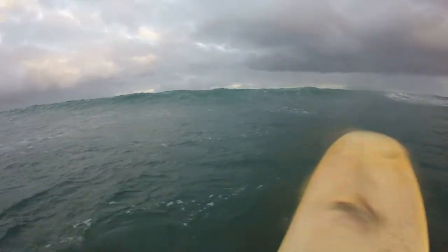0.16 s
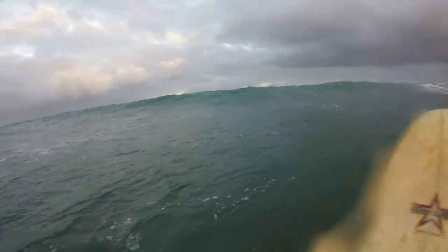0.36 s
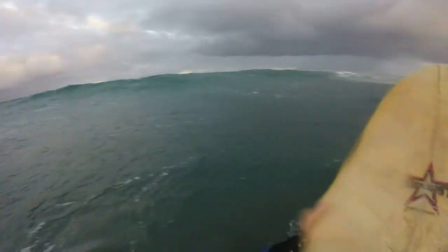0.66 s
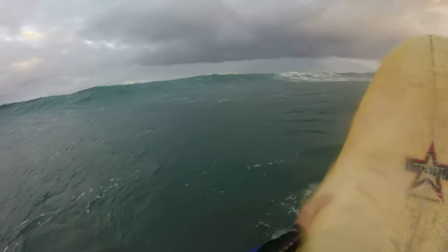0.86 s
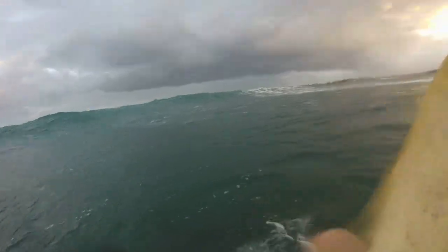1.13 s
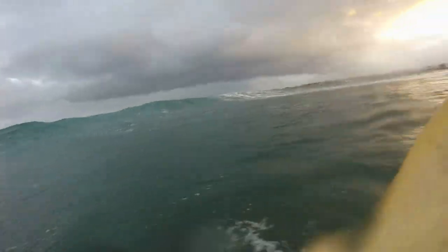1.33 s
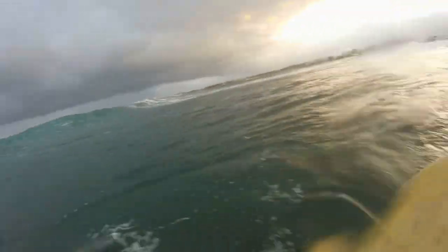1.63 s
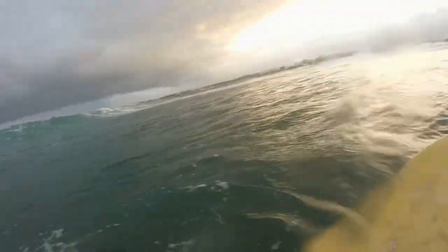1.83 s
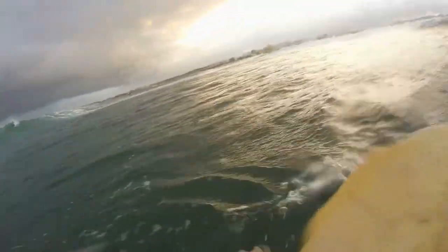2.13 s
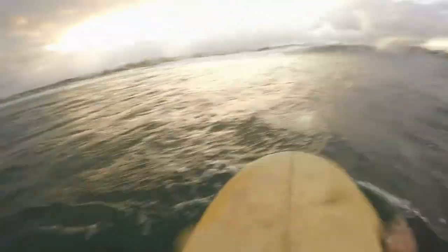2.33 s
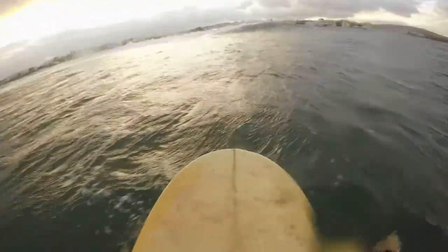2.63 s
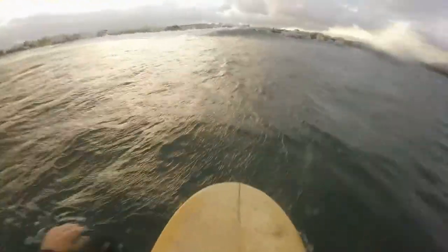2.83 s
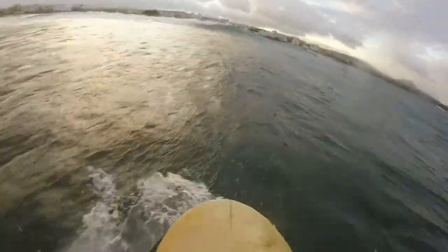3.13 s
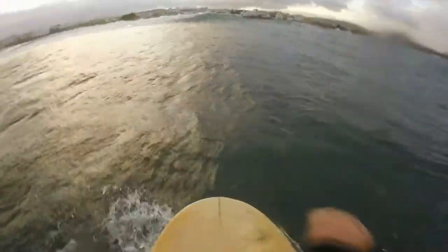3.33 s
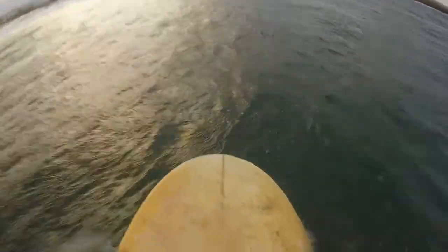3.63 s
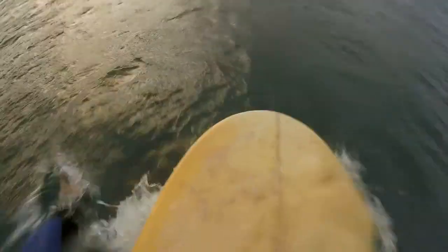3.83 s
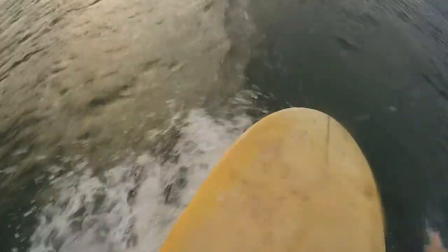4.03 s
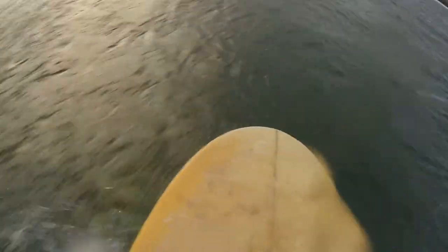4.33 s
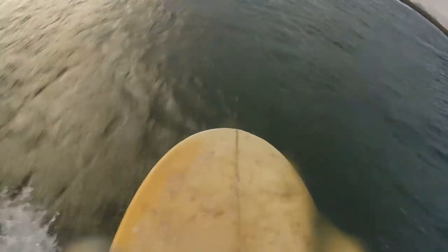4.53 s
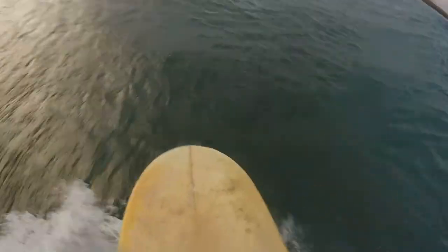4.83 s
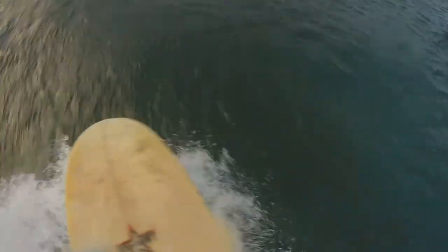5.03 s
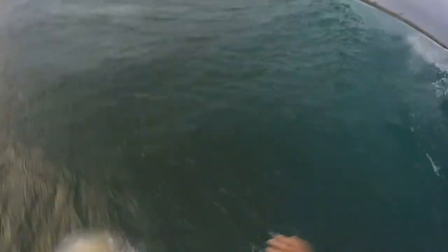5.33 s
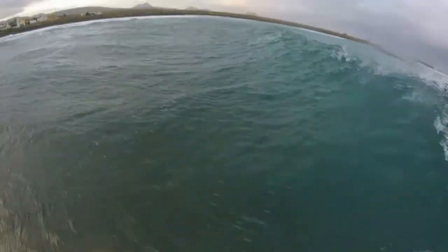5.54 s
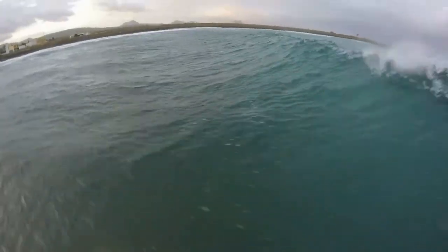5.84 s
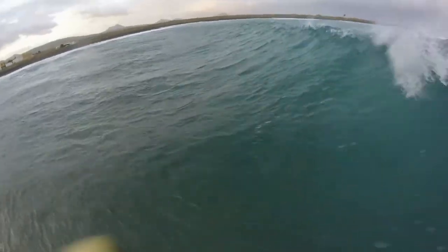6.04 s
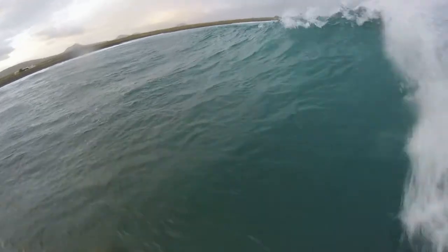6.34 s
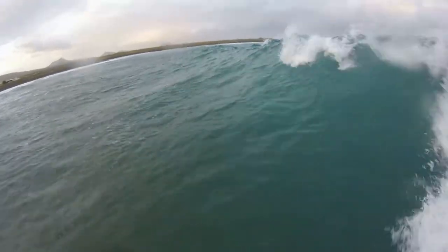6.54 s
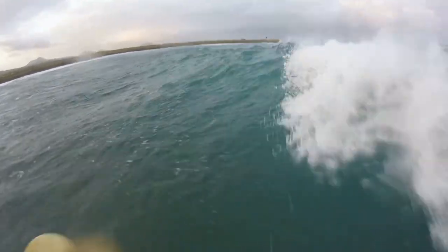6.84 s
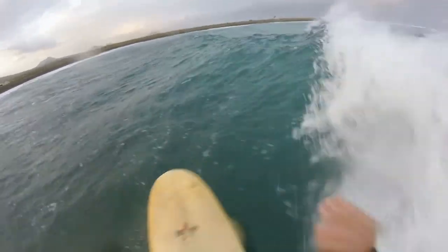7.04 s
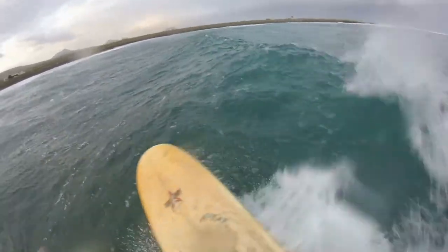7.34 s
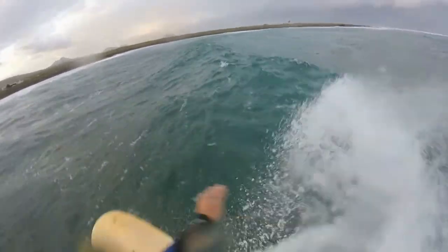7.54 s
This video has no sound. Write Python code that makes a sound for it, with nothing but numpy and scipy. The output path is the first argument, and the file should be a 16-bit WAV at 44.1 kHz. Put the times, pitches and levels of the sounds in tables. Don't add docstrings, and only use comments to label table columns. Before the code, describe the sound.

Open sea from a surfboard, heard very close through a sealed housing that makes the water boxy and hollow, with a midrange ring and subdued top end. From 0 to 1.7 s a soft, bubbly trickling rush wavers, with faint ticks and a knock near 1.2 s. Around 1.75-2 s a tight cluster of hard drops knocks on the case. From 2 to 3.8 s the rush grows, with plops, small spray bursts, wind flutters and a low hull slap near 3.25 s. From 3.8 to 5.3 s water runs stronger; sharp clicking thuds land near 4.25, 4.55 and 4.8 s, with grainy spray, deep gulps and thumps, heaviest around 4.3 and 5.2 s. By 5.5 s breaking whitewater surges up, dense and much louder, churning with fizzing spray and short slaps. A crisp tick comes at 6.8 s, the roar peaks near 7 s, then recedes until 7.7 s.

```python
import sys
import numpy as np
from scipy import signal
from scipy.fft import rfft, irfft, next_fast_len
from scipy.io import wavfile
from scipy.ndimage import uniform_filter1d, map_coordinates

SR = 44100
rng = np.random.default_rng(int(sys.argv[2]) if len(sys.argv) > 2 else 0)


def rack_gain(trim_db):
    fader = np.asarray(trim_db, float)
    return 10 ** (fader / 20)


def wrap_up_sound(samples):
    columns = np.atleast_2d(samples).T
    tamed = np.clip(columns, -1, 1)
    steps = np.round(tamed * 32767).astype(np.int16)
    wavfile.write(sys.argv[1], SR, steps)


N = 338688

# time in seconds, churn level in dB, spray level in dB.
PADDLE_WATER = [(0.0, -52, -68), (0.5, -49.5, -66), (0.8, -48.5, -65.5), (1.07, -51.5, -67.5),
                (1.17, -46, -63), (1.32, -45.5, -63), (1.51, -50.5, -67), (1.8, -51, -71), (2.3, -45, -64),
                (2.74, -42.5, -61), (3.25, -39.5, -58), (3.74, -44.5, -60.5), (4.0, -35, -54),
                (4.44, -34.5, -52.5), (4.63, -37.5, -53.5), (5.25, -38.5, -51.5), (5.33, -36, -50.5),
                (5.45, -30, -48.5)]
# time in seconds, churn level in dB, spray level in dB.
BREAKING_WATER = [(5.6, -26, -50.5), (6.1, -28, -49), (6.3, -27.5, -46), (6.43, -29, -44),
                  (6.6, -29.5, -44.5), (6.8, -30.5, -48.5), (6.91, -27.5, -47), (7.02, -25, -44.5),
                  (7.25, -26.5, -46.5), (7.36, -30.5, -43), (7.68, -35, -50)]


def water():
    # frequency in Hz, level in dB per Hz.
    calm_colour = [(470, -25), (800, -16), (911, -29), (1100, -7.5), (1200, -9), (1480, 1.5), (1560, 2.5),
                   (1700, -1.5), (2170, 0), (2400, -9.5), (3100, -15.5), (4030, -55), (6820, -120)]
    housing_colour = [(530, -31), (900, -24), (1120, -15), (1270, -10.5), (1470, 1.5), (1640, -2.5),
                      (2410, -4.5), (2730, -22.5), (2900, -20), (3770, -38), (6380, -120)]
    splash_colour = [(1530, -13.5), (2600, -1), (2750, -5), (3300, -1.5), (3900, -5), (4400, -7.5),
                     (5000, -15), (6100, -26), (10000, -120)]
    spray_colour = [(2650, -1.5), (4500, -7.5), (5020, -5.5), (5510, -0.5), (6410, -1.5), (7330, -3.5),
                    (8070, -5.5), (8640, -5.5), (9300, -15), (10000, -12.5), (11000, -14.5), (12500, -20),
                    (13700, -20.5), (14500, -60)]
    # time in seconds, peak in dB over the churn, half length in seconds.
    rail_slaps = [(.816, -12, .02), (1.26, -5, .01), (1.613, -1, .015), (3.35, -7, 0.032),
                  (5.47, -10, .012), (5.8, -11, 0.025), (6.3, -11, .03), (6.57, -11, 0.031),
                  (6.87, -19, 0.014), (7.13, -12, 0.013), (7.244, -11, 0.025), (7.32, -25, .015),
                  (7.45, -7, 0.014)]

    churn_db, spray_db = curves(PADDLE_WATER + BREAKING_WATER)
    over_middling_db = churn_db + 40
    splash_db = -52.5 + 0.93 * over_middling_db
    bubble_share = np.clip(0.19 - 0.0054 * over_middling_db, 0, 0.6)
    slaps_db = bubble_share * (wobble(11) + 2.65 * wobble(35))

    big_bubbles = bubbles(count=2500, hz=2260, spread=0.433, cycles=17, spiky_db=1.5)
    churn = patchy(patchy_db=1.04) + bubble_share * big_bubbles
    small_bubbles = bubbles(count=4000, hz=7000, spread=0.47, cycles=24, spiky_db=6.5)
    fizz = patchy(patchy_db=1.64) + bubble_share * small_bubbles

    rush = loaded(blend(churn, calm_colour, housing_colour))
    rush *= rack_gain(churn_db + slaps_db + 0.086 * wobble(22) - 1.7) * (1 + swells(rail_slaps))
    splash_gain = rack_gain(splash_db + 2.0 * slaps_db + 0.22 * wobble(4.2) - 1.7)
    splash = splash_gain * coloured(churn, splash_colour)
    spray = rack_gain(spray_db + 2.4 * slaps_db + 0.6) * coloured(fizz, spray_colour)
    return rush + splash + spray


def loaded(x):
    # time in seconds, lowest mode in dB, middle mode in dB, top mode in dB.
    mode_gains = [(0, -0.5, 2.5, -2), (1.0, -1, 0.5, -1), (1.9, -1.5, 1.5, 0), (2.3, -1, -1, 0),
                  (2.75, 1, -11, -9), (3.3, -0.5, 0, -3), (3.8, 1, -3, -4.5), (4.4, 2, 1.5, 2.5),
                  (5.3, 1, 2, 0), (5.7, -0.5, 0.5, 2), (6.25, 2.5, -2, 1.5), (6.6, -5, 4, 0.5),
                  (7.0, 2, -1, 0), (7.3, 0, 1.5, 0), (7.68, -5, 1, -0.5)]
    mode_bands_hz = [(1350, 1620), (1700, 1960), (2280, 2620)]
    out = x
    for db, band_hz in zip(curves(mode_gains), mode_bands_hz):
        sos = signal.butter(2, band_hz, "band", fs=SR, output="sos")
        out = out + (rack_gain(db) - 1) * signal.sosfiltfilt(sos, x)
    return out


def blend(x, near, far):
    wave_share = np.interp(np.arange(N) / SR, [3.7, 4.1, 5.1, 5.5], [0.47, 0.33, 0.5, 0.79])
    return unit((1 - wave_share) * coloured(x, near) + wave_share * coloured(x, far))


def bubbles(count, hz, spread, cycles, spiky_db):
    s, normal = rng.random(count) * N / SR, rng.standard_normal((count, 2))
    pitch = np.clip(hz * np.exp(spread * normal[:, 0]), 300, SR / 3)
    return unit(rings(s, pitch, cycles / pitch, rack_gain(spiky_db * normal[:, 1]), rise=0.44, size=256))


def ridges():
    # centre in Hz, width in Hz, level in dB over the spray.
    upper_modes = [(6440, 400, -12), (8030, 380, -16.5), (9230, 550, -16)]
    # time in seconds, peak in dB over the spray, half length in seconds.
    film_swells = [
        (.38, -1, 0.28),
        (.79, 8, 0.019),
        (1.3, 2, 0.22),
        (3.7, -7, 0.13),
        (4.13, 1, 0.13),
        (5.5, -7.5, 0.63),
        (6.53, -4, 0.14),
        (7.4, -7, 0.75),
    ]
    churn_db, spray_db = curves(PADDLE_WATER + BREAKING_WATER)
    upper = 0
    for hz, width, db in upper_modes:
        upper = upper + rack_gain(db + 2.1 * wobble(3.3)) * narrow(hz, width)

    film = rack_gain(-4) + swells(film_swells)
    blips_db = np.clip(-0.2 * (churn_db + 28), 1, 5) * wobble(45)
    singing = film * rack_gain(0.88 * wobble(12) + blips_db - 3.5) * narrow(3950, 330)
    return rack_gain(spray_db) * (upper + singing)


def narrow(hz, width):
    skirt = [(hz - 2 * width, -60), (hz - width / 2, -3), (hz, 0), (hz + width / 2, -3), (hz + 2 * width, -60)]
    return coloured(rng.standard_normal(N), skirt)


def sheets():
    # start in seconds, peak level in dB, length in seconds.
    thrown = [(0.353, -50, 0.02), (1.434, -47.5, 0.025), (1.464, -49, 0.017), (2.126, -49, 0.031),
              (2.228, -49, 0.03), (2.26, -46.5, 0.057), (2.471, -48, 0.03), (2.593, -45, 0.026),
              (3.077, -49, 0.014), (3.18, -45, 0.033), (3.498, -43, 0.018), (3.54, -62, 0.02),
              (3.636, -45, 0.013), (3.643, -41.5, 0.029), (3.796, -37, 0.027), (3.935, -43, 0.052),
              (4.104, -39, 0.018), (4.136, -37, 0.023), (4.1594, -40, 0.022), (4.536, -30, 0.024),
              (4.594, -37.5, 0.041)]
    # frequency in Hz, level in dB per Hz.
    sheet_colour = [(800, -26), (1500, 6), (2300, 13), (4000, 3), (5000, -2.5), (8000, -2), (10000, -11),
                    (13700, -23), (14500, -60)]
    t, level = np.arange(4000) / SR, np.zeros(N)
    for s, db, length in thrown:
        attack = 1 - np.exp(-12 * t / length)
        level[round(s * SR):][:4000] += rack_gain(db - 3.5) * attack * np.exp(-(t / length) ** 3)
    grain = rack_gain(3 * wobble(300))
    return level * coloured(grain * rng.standard_normal(N), sheet_colour)


def thuds():
    # start in seconds, peak in dB, pitch in Hz, splash in dB over the thud, splash pitch in Hz.
    heavy_drops = [(1.1877, -26, 1850, -17, 3500), (1.7495, -33, 2200, -12, 3200),
                   (1.7545, -29, 2300, -14, 3300), (1.771, -26.5, 2420, -17, 3400),
                   (1.8275, -17, 2100, -14, 3530), (1.8334, -22, 1800, -16, 4020),
                   (1.894, -27.5, 1830, -13, 3520), (1.921, -33, 1700, -14, 3500),
                   (1.9222, -13, 2110, -13, 3280), (1.9268, -19, 1900, -16, 3300),
                   (1.9305, -32, 1800, -15, 4200), (1.9565, -43, 1900, -12, 3900),
                   (1.9776, -16, 1900, -14.5, 3550), (2.24, -33, 1560, -21, 3500),
                   (2.303, -25, 1540, -14, 3100), (2.443, -37, 2160, -27, 3500),
                   (2.602, -23, 2150, -14, 3200), (2.666, -24.5, 1550, -24, 3500),
                   (2.7014, -23, 1470, -29, 3500), (2.786, -22.5, 1470, -27, 3000),
                   (3.186, -24, 2400, -10, 2900), (3.6465, -34, 1520, -8, 4000),
                   (3.7987, -19.5, 2200, -9, 2900), (3.8016, -19.5, 2100, -21, 3500),
                   (3.838, -17.5, 2150, -24, 3160), (4.2542, -11.5, 2420, -13.5, 3800),
                   (4.535, -15.5, 1550, -16, 3300), (4.5456, -20, 2100, -12, 3020),
                   (4.5523, -20, 1750, -22, 3000), (4.8101, -9, 1680, -45, 3000),
                   (4.8432, -18, 2100, -34, 3000), (4.85, -21, 2030, -30, 3000)]
    s, db, hz, splash_db, splash_hz = np.transpose(heavy_drops)
    t60 = 0.017 * rack_gain(0.08 * (db + 32.5))
    splashes = drops(s, db + splash_db, splash_hz, 0.64 * t60, spread=0.29, count=6)
    return through_housing(knocks(s, db, hz, t60) + splashes)


def knocks(s, db, hz, t60):
    cavity_modes = [1464, 1800, 2100, 2420]
    mode = np.tile(cavity_modes, len(s))
    s, db, hz, t60 = np.repeat([s, db, hz, t60], len(cavity_modes), axis=1)
    scatter = rng.standard_normal((len(s), 2))
    level_db = db - 4 - 80 * np.log(mode / hz) ** 2 + 1.2 * scatter[:, 0]
    life = np.clip(0.8 * t60 * 1700 / mode, 0.004, 0.022)
    pitch = mode * (1 + 0.015 * scatter[:, 1])
    return rings(s + 0.00031, pitch, life, rack_gain(level_db), rise=0.013, size=1000, sharp=27)


def ticks():
    # start in seconds, peak level in dB, pitch in Hz, pitch spread as a log ratio.
    droplets = [(0.1032, -48, 7500, 0.15), (0.786, -46, 7300, 0.3), (1.0336, -42, 6400, 0.51),
                (1.199, -42, 6450, 0.58), (1.5683, -46, 6410, 0.61), (1.7494, -39, 7700, 0.25),
                (1.754, -44, 8500, .25), (1.7704, -41, 7700, 0.39), (1.8265, -32, 8150, 0.11),
                (1.8263, -37, 5400, .1), (1.827, -51, 11500, .08), (1.833, -42, 6500, 0.3),
                (1.8946, -41, 7140, 0.3), (1.9192, -44, 8110, 0.49), (1.922, -33, 6300, 0.33),
                (1.931, -49, 7530, 0.3), (1.956, -49, 6320, 0.33), (1.9786, -34, 7000, 0.47),
                (2.349, -44, 8540, 0.22), (2.4683, -44, 6500, 0.3), (2.598, -44, 6500, 0.43),
                (2.999, -43, 8400, 0.49), (3.4965, -42, 6500, 0.3), (3.6474, -38, 6590, 0.35),
                (3.7993, -32, 7900, 0.26), (4.111, -36, 7130, 0.35), (4.16, -29, 7000, 0.38),
                (4.254, -20, 8540, 0.3), (4.5372, -34, 8160, 0.25), (4.836, -24, 7860, 0.11),
                (4.8362, -33, 5800, 0.22), (4.261, -37, 8500, .2), (5.5272, -26.5, 5960, 0.56),
                (6.7974, -19, 7850, 0.13), (4.254, -36, 12500, 0.11), (4.254, -26, 5600, .15),
                (1.9222, -46, 12000, 0.14), (6.7973, -35.5, 9800, 0.18), (1.8335, -52, 12000, .1)]
    s, db, hz, spread = np.transpose(droplets)
    t60 = np.full(len(s), 0.0063)
    return through_housing(drops(s, db - 4.5, hz, t60, np.clip(spread, 0.05, 0.6), count=11))


def plops():
    # start in seconds, peak level in dB, pitch in Hz, T60 in seconds, pitch spread as a log ratio.
    single_bubbles = [(.39, -40, 950, 0.016, .3), (1.197, -31, 1800, 0.034, 0.052),
                      (2.444, -26, 2190, 0.022, 0.046), (2.886, -33, 3860, 0.022, 0.028),
                      (3.747, -36, 800, .013, 0.3), (3.839, -32, 780, 0.018, 0.27),
                      (2.135, -39, 3150, 0.022, .04), (2.239, -34, 1500, 0.017, .05),
                      (4.811, -25, 1470, 0.024, .04), (2.157, -44, 4000, .015, .04),
                      (2.182, -44, 3950, .015, .04), (2.276, -43, 4070, .015, .05),
                      (2.351, -38, 1850, .015, .05), (2.485, -34, 1520, .015, .05),
                      (2.575, -30, 1450, .015, .05)]
    return drops(*np.transpose(single_bubbles), count=3)


def drops(s, db, hz, t60, spread, count):
    fan = np.tile(np.linspace(-1, 1, count), len(s))
    s, db, hz, t60, spread = np.repeat([s, db, hz, t60, spread + 0 * s], count, axis=1)
    scatter = rng.standard_normal((len(s), 3))
    pitch = np.clip(hz * np.exp(spread * (fan + 0.05 * scatter[:, 0])), 300, SR / 3)
    level_db = db - 17.5 * fan ** 2 + 1.2 * scatter[:, 1]
    start = s + 0.0009 + 0.0001 * scatter[:, 2]
    return rings(start, pitch, np.clip(t60, 0.002, 0.04), rack_gain(level_db), rise=0.014, size=1000)


def through_housing(x):
    return signal.sosfilt(signal.butter(3, [1100, 15000], "band", fs=SR, output="sos"), x)


def gulps():
    # start in seconds, length in seconds, level in dB, first pitch in Hz, last pitch in Hz.
    low_glides = [(3.23, 0.066, -53, 151, 98), (4.25, 0.078, -36, 172, 170),
                  (5.115, 0.153, -33, 183.5, 125), (3.239, 0.062, -33, 89, 65),
                  (4.808, 0.0125, -32, 270, 266), (5.197, 0.072, -26.5, 73, 53),
                  (4.262, 0.05, -37, 94, 95), (5.2, 0.051, -31.5, 139, 110), (4.41, 0.075, -43, 250, 282),
                  (4.1, 0.074, -45, 225, 255), (5.255, 0.032, -45, 480, 500)]
    t, low = np.arange(N) / SR, np.zeros(N)
    for s, length, db, from_hz, to_hz in low_glides:
        u = np.clip((t - s) / length, 0, 1)
        cycles = length * u * (from_hz + (to_hz - from_hz) * u / 2)
        low += rack_gain(db) * np.sqrt(np.abs(np.sin(np.pi * u))) * np.sin(2 * np.pi * cycles)
    return low


def hull():
    # time in seconds, level in dB.
    planing_levels = [(0.0, -55.5), (2.0, -55.5), (2.15, -53.5), (3.93, -55), (4.05, -45), (4.17, -42.5),
                      (4.4, -47.5), (5.3, -46.5), (5.62, -42.5), (7.2, -41.5), (7.68, -47)]
    # time in seconds, peak level in dB, half length in seconds.
    hull_slams = [(1.64, -56, 0.029), (1.83, -56, 0.077), (2.06, -58, .05), (2.5, -61, 0.18),
                  (2.73, -67, 0.034), (3.26, -43, 0.047), (3.63, -58, 0.034), (3.81, -54, 0.031),
                  (3.95, -52, 0.048), (4.12, -43.5, 0.036), (4.28, -34, 0.027), (4.56, -45.5, 0.063),
                  (4.815, -48, 0.017), (5.04, -42.5, 0.043), (5.2, -37.5, 0.047), (5.39, -45.5, 0.039),
                  (6.2, -58, 0.021), (6.4, -49, 0.025), (7.2, -55, 0.054)]
    # frequency in Hz, level in dB per Hz.
    thump_colour = [(32, -43), (55, 5), (166, -6), (200, -55), (260, -11.5), (440, -120)]
    slosh_colour = [(100, -2), (170, -3), (260, -1.5), (480, -7), (600, -14.5), (950, -35), (1240, -53),
                    (2090, -120)]
    roar_colour = [(100, -32), (170, 2.5), (330, -4.5), (473, -2), (595, -9), (841, -15.5), (950, -8),
                   (1240, -3), (2090, -120)]
    planing, slams = rack_gain(curves(planing_levels)[0]), swells(hull_slams)
    thump = unit(rack_gain(0.67 * wobble(25)) * coloured(rng.standard_normal(N), thump_colour))
    roar = unit(rack_gain(0.84 * wobble(15)) * blend(patchy(patchy_db=0.7), slosh_colour, roar_colour))
    return (rack_gain(-0.5) * planing + slams) * thump + (planing + rack_gain(-23.5) * slams) * roar


def wind():
    # time in seconds, level in dB.
    steady_wind = [
        (0.0, -52),
        (2.0, -48.5),
        (2.9, -44),
        (3.6, -42),
        (3.9, -38),
        (5.25, -43),
        (5.4, -49),
        (7.68, -44),
    ]
    # time in seconds, peak level in dB, half length in seconds.
    gusts = [(0.0, -54, .06), (1.65, -51, 0.12), (2.1, -39, 0.043), (2.57, -47, 0.06), (2.79, -37, 0.013),
             (3.25, -43.5, 0.2), (3.94, -34, 0.065), (4.12, -42, 0.034), (4.27, -45.5, 0.026),
             (4.47, -48, 0.041), (4.77, -34, 0.062), (5.03, -38.5, 0.094), (5.15, -39, 0.021),
             (5.26, -30, 0.023), (6.4, -56, 0.035), (7.2, -56, 0.063)]
    # frequency in Hz, level in dB per Hz.
    buffet_colour = [(6, -14), (10, 18), (28, 15), (45, 2.5), (70, -7), (91, -8), (150, -120)]
    buffet = coloured(rng.standard_normal(N), buffet_colour)
    return (rack_gain(curves(steady_wind)[0]) + swells(gusts)) * buffet


def unit(x):
    return x / np.sqrt(np.mean(x ** 2) + 1e-20)


def curves(rows):
    s, *cols = np.transpose(rows)
    return [np.interp(np.arange(N) / SR, s, c) for c in cols]


def swells(rows):
    t = np.arange(N) / SR
    gain = np.zeros(N)
    for s, db, half in rows:
        gain += rack_gain(db) * np.cos(np.pi / 2 * np.clip((t - s) / (2 * half), -1, 1)) ** 2
    return gain


def wobble(rate):
    coarse = np.arange(0, N + 32, 32)
    knots = rng.standard_normal(int(N * rate / SR) + 4)
    return np.interp(np.arange(N), coarse, map_coordinates(knots, [coarse * rate / SR]))


def coloured(x, spectrum):
    m = next_fast_len(N + 8192)
    f, db = np.transpose(spectrum)
    gain_db = np.interp(np.log(np.fft.rfftfreq(m, 1 / SR) + 1), np.log(f + 1), db)
    return unit(irfft(rfft(x, m) * rack_gain(gain_db), m)[:N])


def patchy(patchy_db):
    z = signal.stft(rng.standard_normal(N + 512), nperseg=512)[2]
    field = uniform_filter1d(rng.standard_normal(z.shape), size=6, axis=0)
    field = uniform_filter1d(field, size=6, axis=1)
    return unit(signal.istft(z * rack_gain(patchy_db * unit(field)), nperseg=512)[1][:N])


def rings(s, hz, t60, gain, rise, size, sharp=90):
    t = np.arange(size) / SR
    u = t / t60[:, None]
    envelope = gain[:, None] * rack_gain(-60 * u) * (1 - np.exp(-sharp * u))
    wave = envelope * np.sin(2 * np.pi * hz[:, None] * t * (1 + rise * u))
    at = np.round(s * SR).astype(int)[:, None] + np.arange(size)
    return np.bincount(at.ravel(), wave.ravel(), N + size)[:N]


def scene():
    on_board = water() + ridges() + sheets()
    impacts = thuds() + ticks() + plops()
    return (on_board + impacts + gulps() + hull() + wind())[None]


def roll_off(x):
    return signal.sosfilt(signal.butter(12, 13980, fs=SR, output="sos"), x)


def record(dry):
    # frequency in Hz, level in dB per Hz.
    hiss_colour = [(150, -28), (400, 18.5), (1000, 18), (2000, 0), (5000, 2.5), (9000, -10), (11000, -8),
                   (12000, -16), (13700, -11), (14500, -50)]
    hiss = rack_gain(-61) * coloured(rng.standard_normal(N), hiss_colour)
    return roll_off(dry + hiss)


dry = scene()
out = record(dry)
wrap_up_sound(out)
```